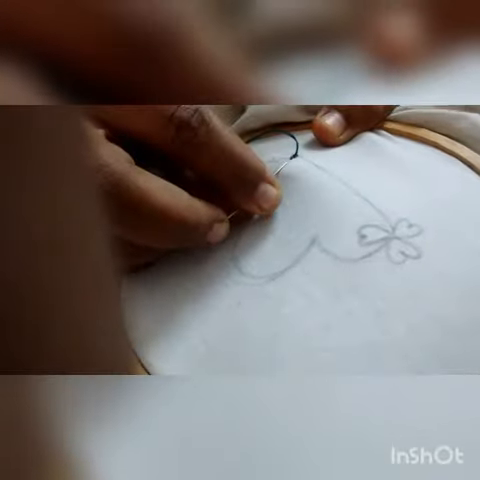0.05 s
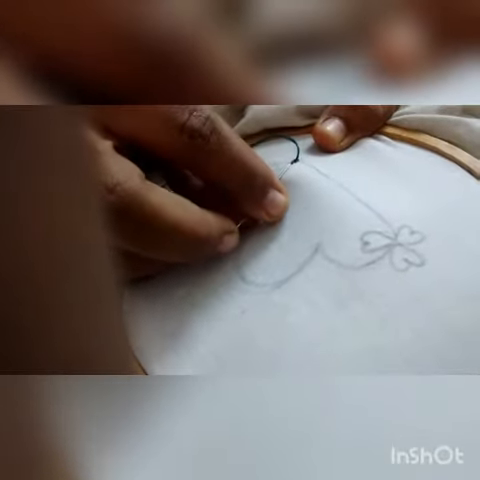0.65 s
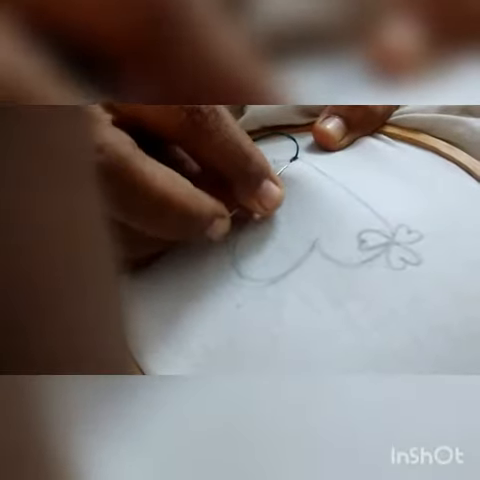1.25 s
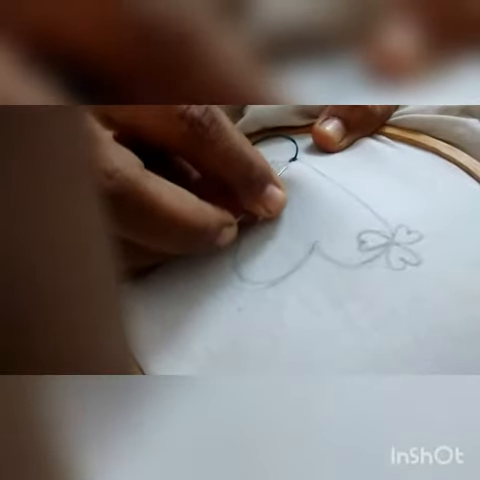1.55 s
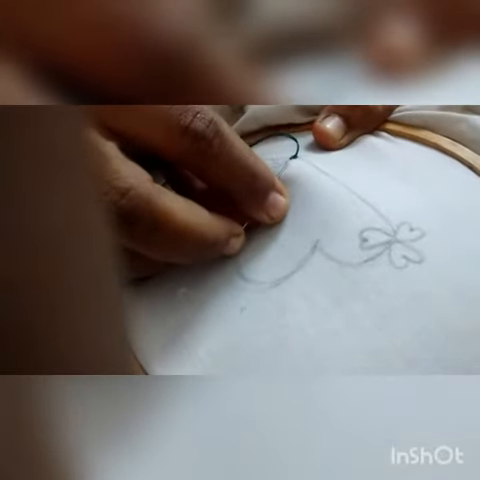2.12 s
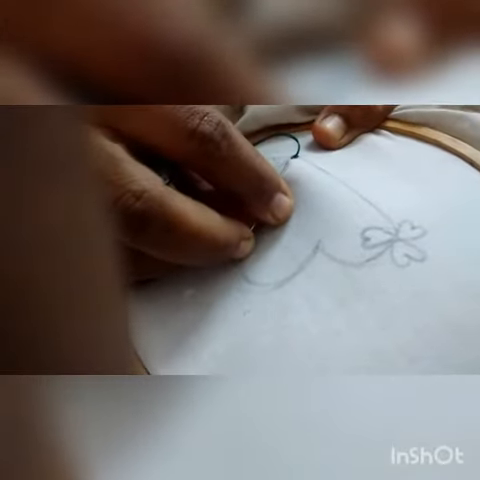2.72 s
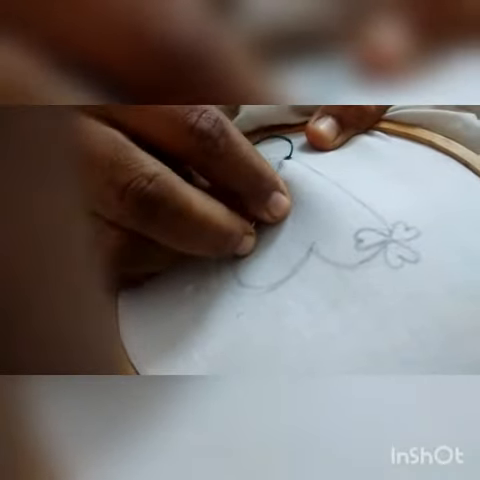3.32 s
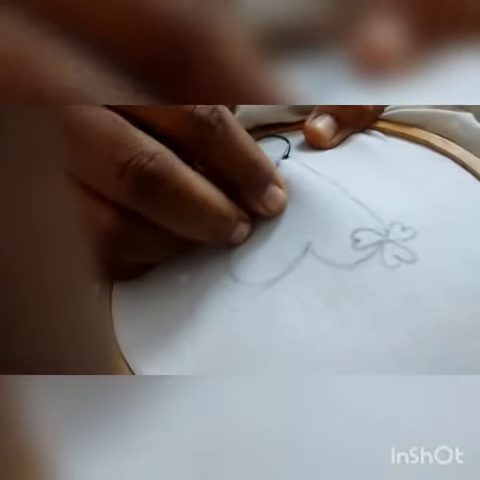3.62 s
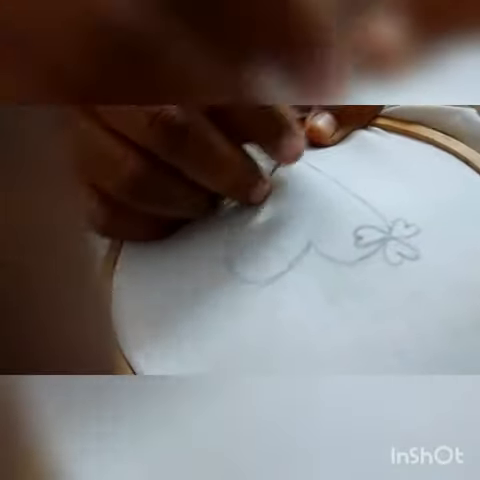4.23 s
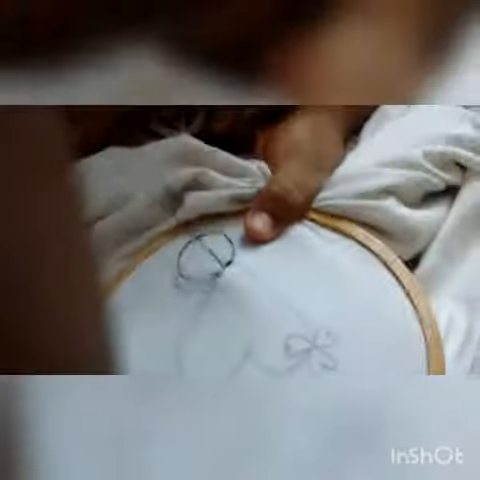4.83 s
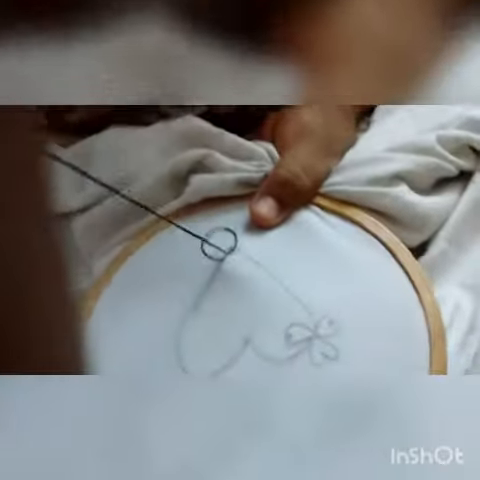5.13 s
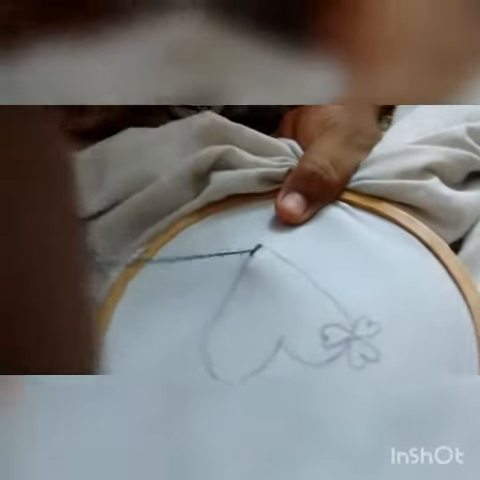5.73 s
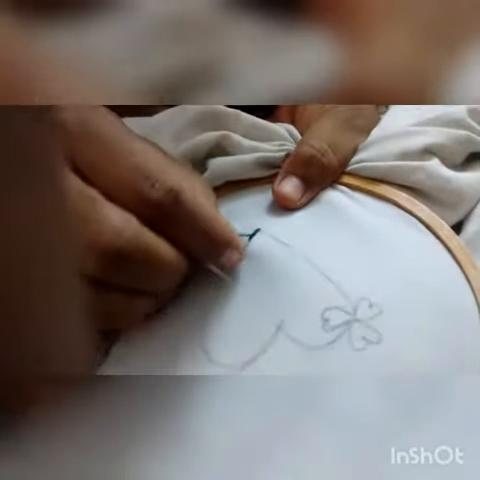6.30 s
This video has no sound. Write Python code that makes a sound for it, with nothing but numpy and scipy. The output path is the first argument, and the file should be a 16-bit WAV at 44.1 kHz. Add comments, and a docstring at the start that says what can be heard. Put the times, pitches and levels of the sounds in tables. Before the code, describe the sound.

A ceiling fan whirs and ticks steadily in a small room, with faint thread rustles and a few low puffs on the microphone.

```python
"""Embroidery under a ceiling fan

A ceiling fan runs in a small room while someone embroiders close to a phone.
Blade turbulence excites the modes of room and housing; the motor whines, and the bearing
ticks twice a turn and chirps faintly. Friction of thread on cloth gives scrapes and rustles.
The draught buffets the microphone, and its hardest puff makes the limiter duck."""
import sys
import numpy as np
from scipy import signal
from scipy.fft import rfft, irfft, next_fast_len
from scipy.io import wavfile
from scipy.ndimage import uniform_filter1d, map_coordinates

SR = 44100
rng = np.random.default_rng(int(sys.argv[2]) if len(sys.argv) > 2 else 0)


def wav_record(signal):
    """Record a signal, one row per channel, as 16-bit PCM in the file named by sys.argv[1]."""
    frames = np.transpose(np.atleast_2d(signal))
    bounded = np.clip(frames, -1, 1)
    # unit amplitude maps onto the largest positive 16-bit level
    quanta = np.round(bounded * 32767).astype(np.int16)
    wavfile.write(sys.argv[1], SR, quanta)


N = 284886
TIME = np.arange(N) / SR
TURN_S = .32  # period of the rotor


def fan_air(level_db=-27, flutter_db=.15, fade_db=2, fade_s=.28):
    """Resonance: broadband blade turbulence is lifted at the modes of room and housing."""
    # spectrum of the blade rush: f/Hz, relative density/dB
    rush = [(25, -7), (60, -3.5), (125, -4), (320, -7), (520, -8), (1100, -2.5), (1550, -7.5), (2200, -9.5),
            (3300, -16.5), (4500, -25), (6400, -41), (7800, -34), (11500, -40.5), (15300, -41)]
    # room modes: f/Hz, width/Hz, lift/dB
    room_modes = [(55, 9.8, 7.5), (84.9, 9.8, 10), (98.5, 10.4, 9.5), (136.3, 17, 12), (168, 13, 11),
                  (188, 15.5, 11), (223.5, 24.7, 7.5), (250.6, 18.3, 9), (297.6, 9.4, 4.5),
                  (368.6, 48, 9.5), (414.3, 39, 10), (470, 32, 4.5), (545, 24.5, 8), (630, 32, 4),
                  (700, 27, 5), (819, 30, 3.5), (905, 44, 3), (1130, 37, 2.5), (1190, 25, 2.5),
                  (1374, 89, 2.5)]
    # motor housing modes: f/Hz, width/Hz, lift/dB
    housing_modes = [(2146, 65, 4.5), (3140, 130, 7.5), (3553, 41, 5), (10800, 500, 2), (12800, 780, 2)]
    # change of colour by reflection from the tilted hoop: f/Hz, gain/dB
    reflection = [(400, -0.55), (800, 1), (1100, -0.1), (1400, -3.5), (1750, 0.7), (2200, -2), (3000, 1),
                  (8000, -0.3)]

    def response(hz):
        lift_db = sum(db * bell(hz, f, width) for f, width, db in room_modes + housing_modes)
        return at_ports(hz) * amp(along(rush, hz) + lift_db)

    air = unit(filtered(rng.standard_normal((2, N)), response).sum(axis=1))
    bass = filtered(air, lambda hz: 1 / (1 + (hz / 500) ** 6))  # room modes keep the bass steady
    air = bass + churned(air - bass, depth_db=1.33)
    air = air + tilt() * filtered(air, lambda hz: amp(along(reflection, hz)) - 1)
    fade_in_db = -fade_db * np.maximum(1 - TIME / fade_s, 0)
    return air * amp(level_db + fade_in_db + flutter_db * wobble(10))


def wavering_hum(air, hum_hz=392, width_hz=100, waver_db=.8):
    """Amplitude modulation of one band: a hum swells out of the rush and sinks back."""
    # swell of the band: t/s, gain/dB
    swell = [(0, -2.5), (.5, -1), (1, -.5), (1.7, -0.5), (2.5, 1), (2.85, -.5), (4, -0.5), (4.35, 1.5),
             (4.9, -2.5), (5.3, 1.5), (5.75, -1.5), (6.3, 1.5)]
    hum = filtered(air, lambda hz: bell(hz, hum_hz, width_hz))
    gain = amp(np.interp(TIME, *np.transpose(swell)) + waver_db * wobble(12))
    return air + hum * (gain - 1)


def whistles(flicker_db=4):
    """Narrow resonances of the motor, driven by noise, flare and fade differently at each port."""
    # resonances: f/Hz, width/Hz, level/dB, change as the hoop tilts/dB
    resonances = [(5436, 42, -66.5, -9), (7530, 50, -71, -10)]
    out = np.zeros((2, N))
    for centre, width, db, tilted_db in resonances:
        ring = filtered(rng.standard_normal((2, N)), lambda hz: bell(hz, centre, width))
        flicker = amp(flicker_db * np.tanh(wobble(20)))
        out += unit(ring * flicker) * amp(db + tilted_db * tilt())
    return out


def ticking(echo_db=-11, echo_t60=.099, knock_db=-29):
    """Periodic impacts: each turn gives one soft knock and two ticks; the ticks reverberate."""
    # hard contacts in the bearing: t within the turn/s, mean level/dB, f/Hz, length/s
    contacts = [(.0745, -33.5, 8700, .00027), (.1258, -37.5, 8700, .00027)]
    turn, age = np.divmod(TIME, TURN_S)
    scatter_db = 1.3 * rng.standard_normal((int(turn[-1]) + 1, len(contacts)))
    strengths = amp(scatter_db)[turn.astype(int)].T
    ticks = sum(strength * amp(db) * blip(age - s, hz, length)
                for strength, (s, db, hz, length) in zip(strengths, contacts))
    tail = rng.standard_normal((2, SR // 5)) * amp(-60 * TIME[:SR // 5] / echo_t60)
    echo = signal.fftconvolve(ticks[None], tail / np.linalg.norm(tail[0]), axes=1)[:, :N]
    knock = amp(knock_db) * blip(age - .066, hz=400, length_s=.0026)
    left = .5 * np.roll(ticks, 8)  # the farther port: weaker and later
    return np.array([left, ticks]) + amp(echo_db) * echo + knock


def bearing(level_db=-57, swing_db=1, rough_db=3, tight_s=.11):
    """Dry friction: the bearing's rub swells with the pressure at the tight spot of each turn."""
    # spectrum of the rub: f/Hz, relative density/dB
    spectrum = [(4500, -8), (5500, 2.5), (6400, -15), (7600, 0), (9000, -7.5), (12000, -15.5), (15000, -26)]
    pressure = np.cos(2 * np.pi * (TIME - tight_s) / TURN_S)
    rub = unit(churned(noise(spectrum), depth_db=5))
    return rub * amp(level_db + swing_db * pressure + rough_db * wobble(30))


def bearing_chirps(width_hz=980, grain_db=3):
    """Narrow-band noise bursts: the fan's bearing gives faint, grainy high chirps."""
    # chirps: t/s, level/dB, length/s, f/Hz
    chirps = [(.395, -60, .03, 7550), (.455, -58, .04, 7550), (1.043, -57, .04, 8040),
              (1.325, -57, .07, 7700), (1.812, -58, 0.046, 7840), (2.32, -56, .03, 7700),
              (2.775, -58, .04, 8050), (3.455, -56, .05, 7850), (4.08, -52.5, .03, 7600),
              (4.225, -57, .06, 7800), (4.387, -57, 0.029, 7600), (6.025, -59, .05, 7700)]
    grain = unit(amp(grain_db * wobble(200)))
    return grain * sum(amp(db) * bell(TIME, s, length) * unit(noise_band(hz, width_hz))
                       for s, db, length, hz in chirps)


def whine(pitch_hz=2151, rise_hz=13, wander_hz=9, flicker_db=3.5, trim_db=-1.2):
    """Frequency and amplitude modulation: the motor's thin tone wavers, and late on sits higher."""
    # envelope of the whine: t/s, level before the trim/dB
    envelope = [(0.0, -50), (0.26, -43), (0.6, -49), (0.88, -43), (1.35, -51), (1.55, -43.5), (2.1, -45),
                (2.33, -51), (2.62, -41.5), (2.9, -49), (3.2, -44), (4.35, -44.5), (4.68, -58), (4.95, -44),
                (5.25, -44), (5.4, -50), (6.46, -52)]
    hz = pitch_hz + rise_hz * tilt() + wander_hz * np.array([wobble(30), wobble(30)])
    tone = np.sin(2 * np.pi * np.cumsum(hz, axis=1) / SR) * amp(flicker_db * wobble(30))
    heard = unit(filtered(tone, at_ports).sum(axis=1))
    return heard * amp(trim_db + np.interp(TIME, *np.transpose(envelope)))


def draught(calm_db=-51, lumps_db=3.5, leak=.76, puff_leak=.54, stray_gain=.16):
    """Turbulent pressure acts on the left port; the right channel follows in antiphase."""
    # gusts: t of the crest/s, level/dB, time to fall 10 dB/s
    gusts = [(1.87, -23.5, 0.22), (2.38, -21, 0.02), (3.26, -28, 1), (3.72, -25, 0.48)]
    # spectrum of the buffeting: f/Hz, relative density/dB
    buffet = [(20, -14), (50, 5), (95, -6), (170, -6.5), (300, -31), (800, -47), (3000, -90)]
    # single eddies hitting the port: t/s, level/dB, f/Hz, length/cycles
    puffs = [(1.575, -11, 121, 2.4), (1.865, -12.5, 144, 1.7), (2.08, -12, 149, 1.4),
             (2.829, -11.5, 120, 1.4), (3.251, -10.5, 109, 1.83), (3.258, -13, 330, 1.1),
             (3.266, -2, 255, 1.4), (3.2723, -1.5, 110, 1.32), (3.284, -12, 150, 2),
             (3.545, -11.5, 101, 1.5), (3.681, -11, 88, 2.1), (3.785, -21, 98, 8.9), (3.824, -12, 80, 3),
             (3.865, -18, 100, 3), (3.936, -22, 80.5, 3)]
    strength = amp(calm_db) + sum(amp(db) * gust(TIME - s, fall_s) for s, db, fall_s in gusts)
    pressure, stray = noise(buffet) * strength * amp(lumps_db * wobble(25.03))
    eddies = sum(amp(db) * blip(TIME - s, hz, cycles / hz) for s, db, hz, cycles in puffs)
    return np.array([pressure + eddies, stray_gain * stray - leak * pressure - puff_leak * eddies])


def scrapes(grain_db=3):
    """Sliding friction: needle and thread drag over the weave in faint, grainy strokes."""
    # strokes: t/s, level/dB, length/s
    strokes = [(1.055, -53, .06), (1.33, -56, .05), (1.57, -54, 0.08), (1.67, -46.5, 0.14),
               (2.795, -51, .06), (3.2, -48, 0.08), (3.45, -49, 0.061), (4.087, -50, 0.023)]
    # spectrum of the weave: f/Hz, relative density/dB
    weave = [(2000, -14), (3800, 9), (5400, 4), (6400, -15),
             (7600, 1), (9200, -6), (11000, -13), (15000, -18)]
    envelope = sum(amp(db) * bell(TIME, s, length) for s, db, length in strokes)
    return envelope * unit(noise(weave) * amp(grain_db * wobble(400)))


def rustles(grain_db=2.5):
    """Friction: each pull of the thread rubs a dull, uneven rustle out of the stretched cloth."""
    # pulls: t/s, level/dB, length/s, f/Hz, width/Hz
    pulls = [(4.305, -36, 0.073, 1490, 890), (4.844, -34.5, 0.12, 990, 700), (4.996, -36, 0.16, 1050, 1000),
             (5.186, -37, 0.08, 1200, 1200)]
    out = np.zeros(N)
    for s, db, length, hz, width in pulls:
        rub = unit(noise_band(hz, width) * amp(grain_db * wobble(60)))
        out += amp(db) * bell(TIME, s, length) * rub
    return out


def bumps_and_puffs():
    """Damped oscillation: soft bumps, and low, briefly ringing puffs of draught on the microphone."""
    # bumps and puffs: t/s, level before the envelope/dB, f/Hz, width/Hz, T60/s
    rings = [(.79, -27, 165, 35, 0.33), (1.1, -25, 950, 130, 0.092), (1.524, -21.5, 955, 130, 0.14),
             (1.565, -26, 1130, 220, .2), (1.585, -26, 990, 200, .12), (3.65, -26, 175, 50, .16),
             (3.691, -20.5, 242, 50, 0.14), (4.09, -24.5, 155, 50, 0.7), (5.5485, -17, 1110, 100, 0.026)]
    out = np.zeros(N)
    for s, db, centre, width, t60 in rings:
        hz = centre + width / np.pi * wobble(120)
        ring = unit(np.sin(2 * np.pi * (np.cumsum(hz) / SR + rng.random())))
        age = np.maximum(TIME - s, 0)
        attack = 1 - np.exp(-age / (.068 * t60))
        out += amp(db) * ring * attack * amp(-60 * age / t60)
    return out


def crackle(level_db=-71, clicks_per_s=70, spread_db=3.5):
    """Random impulses: a faint, fine crackle in the top of the hiss."""
    onsets = rng.random(N) < clicks_per_s / SR
    clicks = onsets * amp(spread_db * np.minimum(rng.exponential(size=(2, N)), 2))
    return amp(level_db) * unit(filtered(clicks, lambda hz: bell(hz, centre=11000, width=5100)))


def at_ports(hz):
    """Partial coherence: gains of a shared and an opposed sound at the two microphone ports."""
    # port pair: f/Hz, coherence/1, lag of the left/rad, left minus right/dB
    ports = [(60, 0.58, 3.6, 5), (118, 0.24, 0.62, 9), (255, 0.95, 1.02, 2.5), (400, 0.85, 0.84, 1.5),
             (630, 0.64, 0.13, 0), (1210, 0.96, 0.1, -0.1), (1820, 0.89, 0.1, 1.5), (2270, 0.82, 1.63, 2),
             (3177, 0.94, 3.12, -1.0), (4190, 0.59, 5.3, 0), (5070, 1, 6.1, -2), (5230, 0.8, 7, 4),
             (6940, 1, 10.65, -1), (7830, 0.7, 12.1, -2), (9600, 0.55, 16.05, -3), (12000, 0, 18.6, 1),
             (15000, 0, 19, 2)]
    spread = np.arccos(np.clip(along(ports, hz, column=1), 0, 1)) / 2
    shared, opposed = np.cos(spread), np.sin(spread)
    left = np.exp(-.5j * along(ports, hz, column=2)) * amp(along(ports, hz, column=3) / 2)
    return np.array([[shared * left, opposed * left], [shared / left, -opposed / left]])


def churned(x, depth_db):
    """Turbulent modulation lifts and drops patches of the spectrum a few hundred hertz wide."""
    spectra = signal.stft(x, nperseg=1024)[2]
    patches = uniform_filter1d(rng.standard_normal(spectra.shape[1:]), size=7, axis=0)
    patches = uniform_filter1d(patches, size=6, axis=1)
    return signal.istft(spectra * amp(depth_db * unit(patches)), nperseg=1024)[1][:, :N]


def tilt(start_s=4.35, length_s=.263):
    """Linear ramp: 0 while the embroidery hoop rests, 1 once it is tilted before the phone."""
    return np.clip((TIME - start_s) / length_s, 0, 1)


def gust(age, fall_s, rise_share=.36):
    """Exponential growth to a crest at age 0, then a slower decay."""
    return amp(-10 * np.maximum(age, -age / rise_share) / fall_s)


def blip(age, hz, length_s):
    """Wave packet: a sine under a Gaussian envelope."""
    return bell(age, 0, length_s) * np.sin(2 * np.pi * hz * age)


def noise(spectrum):
    """Two incoherent noises of one spectrum, rms 1."""
    return unit(filtered(rng.standard_normal((2, N)), lambda hz: amp(along(spectrum, hz))))


def noise_band(centre_hz, width_hz):
    """White noise through a Gaussian band-pass."""
    return filtered(rng.standard_normal(N), lambda hz: bell(hz, centre_hz, width_hz))


def filtered(x, response):
    """Linear filtering: the spectrum of x times a frequency response."""
    size = next_fast_len(N + SR // 4)
    return irfft(rfft(x, size) * response(np.fft.rfftfreq(size, 1 / SR)), size)[..., :N]


def wobble(knots_per_s):
    """Slow noise: a spline through random knots."""
    knots = rng.standard_normal(int(N * knots_per_s / SR) + 4)
    return map_coordinates(knots, [TIME * knots_per_s])


def along(table, hz, column=1):
    """Interpolation of one column on a log-frequency axis."""
    columns = np.transpose(table)
    return np.interp(np.log(hz + 1), np.log(columns[0] + 1), columns[column])


def bell(x, centre, width):
    """Gaussian of height 1; width is two standard deviations."""
    return np.exp(-2 * ((x - centre) / width) ** 2)


def amp(db):
    """Decibels to amplitude ratio."""
    return 10 ** (np.asarray(db) / 20)


def unit(x):
    """Normalisation to rms 1."""
    return x / np.sqrt(np.mean(x ** 2) + 1e-20)


def scene():
    """Superposition of all sources at the two ports."""
    fan = wavering_hum(fan_air()) + whistles() + ticking() + bearing() + whine()
    return fan + draught() + scrapes() + bearing_chirps() + crackle() + rustles() + bumps_and_puffs()


def limited(x, ceiling_db=-4.5, release_db_per_s=3.5):
    """Peak limiting: a peak over the ceiling pulls the gain down at once; it creeps back steadily."""
    peak_db = 20 * np.log10(np.abs(x).max(axis=0) + 1e-9)
    over_db = np.maximum(peak_db - ceiling_db, 0)
    creep_db = release_db_per_s * TIME
    cut_db = np.maximum.accumulate(over_db + creep_db) - creep_db
    return x * amp(-uniform_filter1d(cut_db, size=128))


def record(dry):
    """Peak and band limiting: the phone ducks on peaks and passes nothing above 15.5 kHz."""
    return filtered(limited(dry), lambda hz: hz < 15500)


dry = scene()
out = record(dry)
wav_record(out)
```